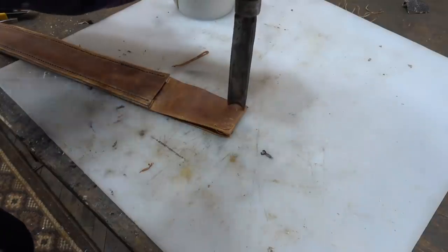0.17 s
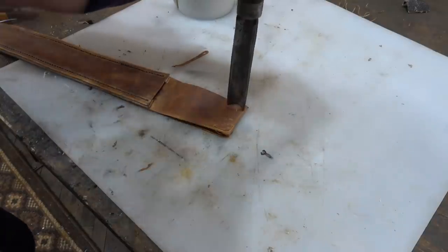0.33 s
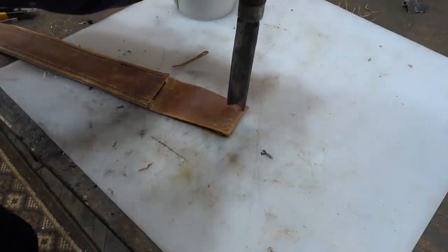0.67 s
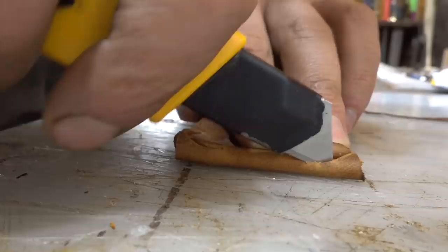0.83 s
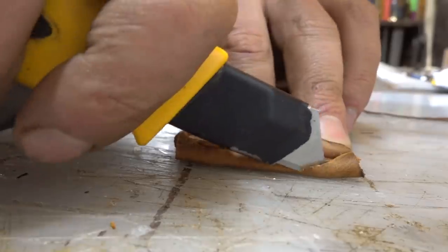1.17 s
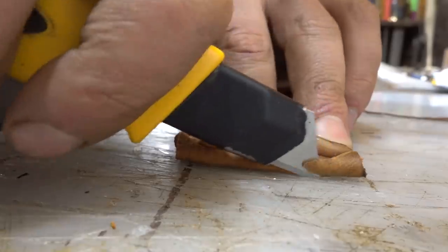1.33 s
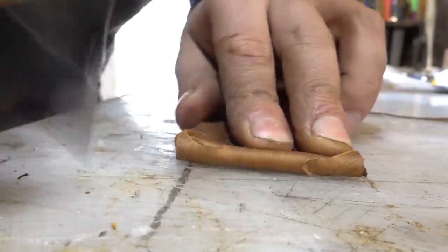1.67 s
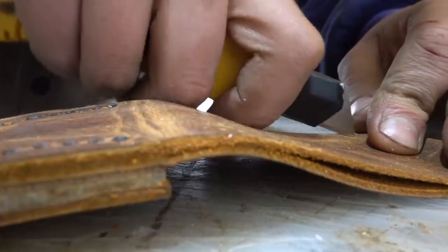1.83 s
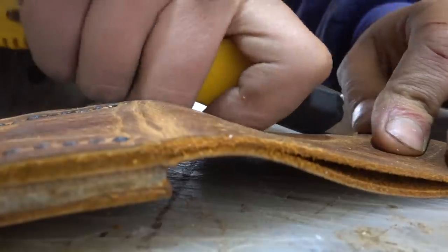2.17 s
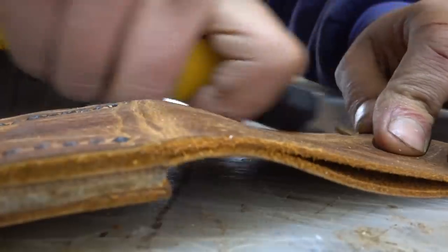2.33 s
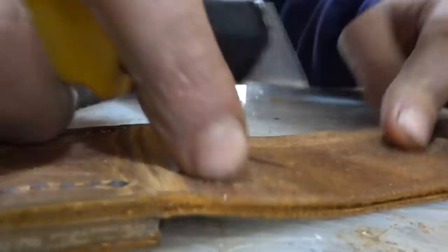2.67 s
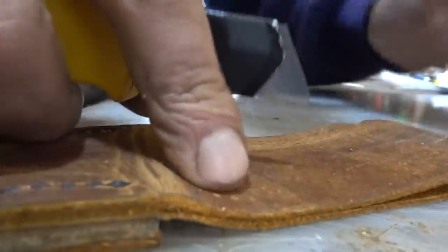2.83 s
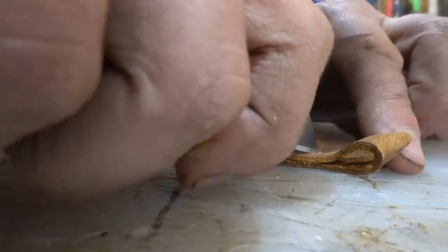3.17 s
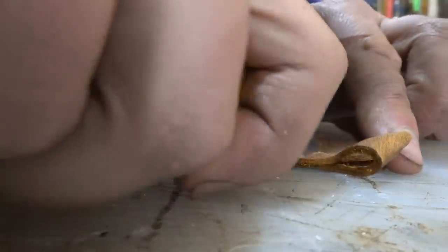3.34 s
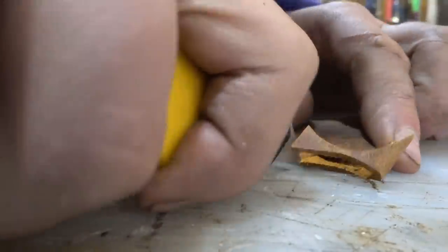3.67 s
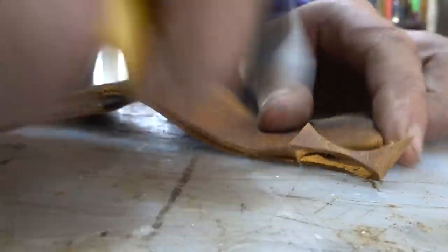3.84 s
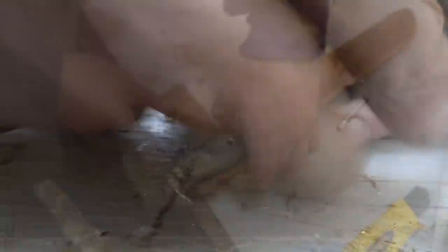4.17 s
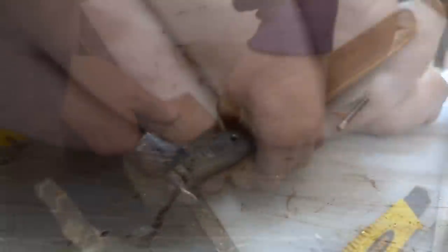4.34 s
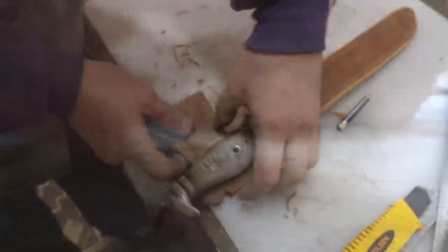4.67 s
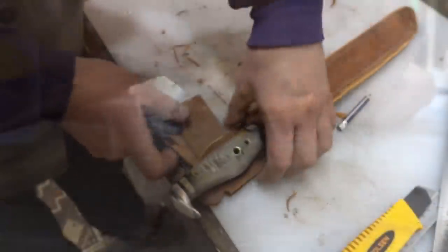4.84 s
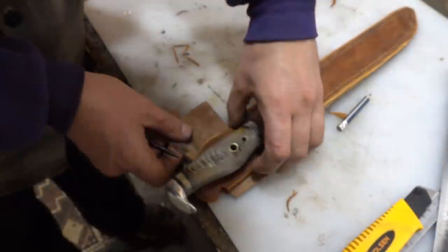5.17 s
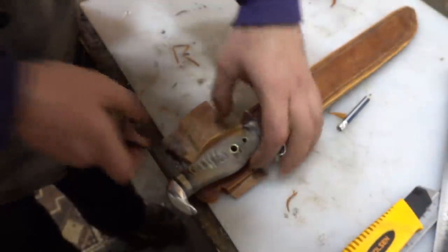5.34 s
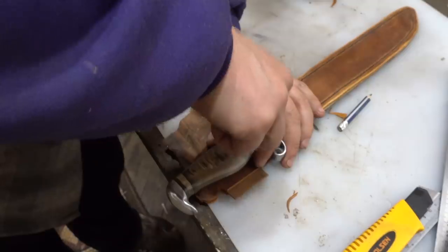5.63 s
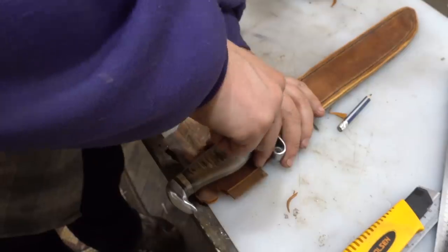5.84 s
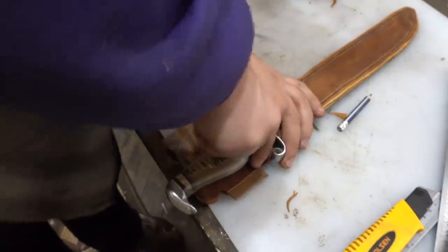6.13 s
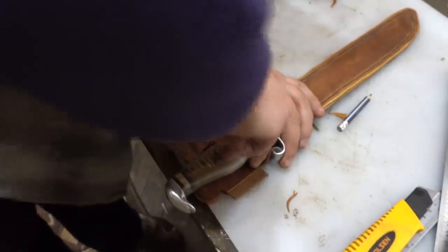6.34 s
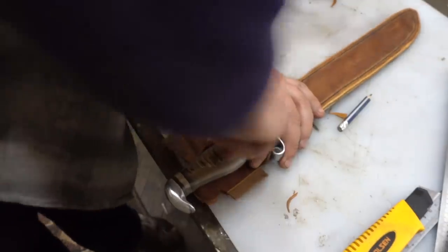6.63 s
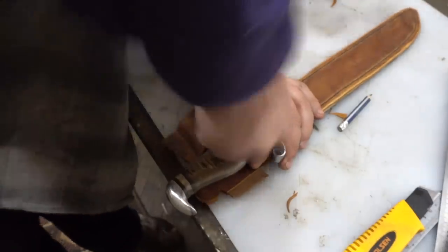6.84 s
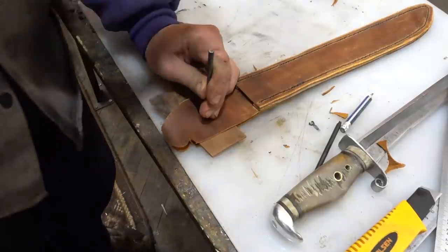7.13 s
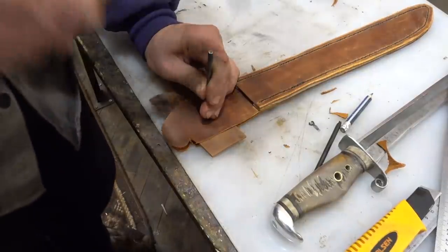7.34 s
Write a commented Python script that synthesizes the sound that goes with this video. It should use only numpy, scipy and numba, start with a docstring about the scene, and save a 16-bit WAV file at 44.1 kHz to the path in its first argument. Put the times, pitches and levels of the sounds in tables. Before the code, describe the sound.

Close stereo pickup at a workbench. Loud, flattened metallic mallet strikes with room ring come first, then suddenly intimate knife work: dry stick-slip rasps through leather, crisp fibre snaps, woody knocks and dull thuds. A softer passage has tiny scribe scratches, light ticks, low hand rumble and cloth rubbing in faint hiss. At the end, two heavy blows burst in with a bright jingling rattle of tools.

```python
"""At a workshop bench, leather is worked on a plastic board in front of a close pair of microphone ports.
Mallet blows on a punch ring bench, steel and room, each flattened by a limiter. Close work is heard between
two mallet shots: stick-slip noise makes a knife rasp and a scribe scratch, short decaying rings make snaps
and knocks, and shaped noise makes hands, sleeves and hiss. In the last two blows loose tools rattle."""
import sys
import numpy as np
from scipy import signal
from scipy.fft import rfft, irfft
from scipy.io import wavfile
from scipy.ndimage import uniform_filter1d, map_coordinates
from numba import njit

SR = 44100
rng = np.random.default_rng(int(sys.argv[2]) if len(sys.argv) > 2 else 0)


def int16_out(signal):
    """Quantize to a 16-bit WAV file."""
    q = np.round(np.clip(np.atleast_2d(signal).T, -1, 1) * 32767)
    wavfile.write(sys.argv[1], SR, q.astype(np.int16))


N = 330750
T = np.arange(N) / SR
HZ = np.maximum(np.arange(N // 2 + 1) * SR / N, 1)

# the close work lies between the two mallet shots
CLOSE_START_S, CLOSE_END_S = .876, 6.92
CLOSE_TOP_HZ, SCRIBE_TOP_HZ, TOP_HZ = 11080, 12150, 14100  # treble cuts

# mallet on a punch: (time [s], force into the limiter [dB], knock [Hz], knock [dB])
BLOWS = [(-.11, 9, 576, 7.5), (.33, 13.5, 448, -24), (.735, 17.5, 470, 4), (6.971, -1.5, 295, 6),
         (7.2709, 5, 380, -17)]
# spectrum of a blow: (frequency [Hz], level [dB])
BLOW_COLOUR = [(40, -8), (120, -2.5), (260, 1.5), (600, 3), (1000, -5), (1450, -7.5), (3700, -12.5),
               (5200, -18.5), (9000, -29), (13500, -44)]
# ringing modes of the bench: (frequency [Hz], level [dB], t60 [s])
BENCH = [(155.5, -6, 0.94), (364, -24, 0.3), (415, -12, 0.88), (572, -13.5, 0.38)]
# the steel punch clangs in a few broad bands: (frequency [Hz], width [Hz], level [dB])
PUNCH = [(1400, 140, 0.5), (2210, 69, -12), (3640, 77, -8.5)]
PUNCH_DB, PUNCH_T60_S = -3, 0.55
# loose tools on the board: (frequency [Hz], width [Hz], level [dB])
LOOSE_TOOLS = [(7870, 1100, 0.5), (9150, 4900, -5.5)]
RATTLE_DB = -7
# a harder blow comes out a little louder: level at force 0, and the share of the force that is added
BLOW_DB, FORCE_SHARE = -38.5, 0.31

# blade strokes: (time of full pressure [s], hold [s], level [dB], rise [s], tearing fibres re level [dB])
STROKES = [(0.923, 0.0042, -48, 0.12, -37), (1.041, 0.03, -34, 0.0026, -15.5),
           (1.173, 0.14, -51.5, 0.053, -16), (1.632, 0.019, -46, 0.037, -4.5),
           (1.996, 0.0068, -21.5, .013, -12), (2.307, 0.21, -54, 0.0073, -7),
           (2.693, 0.084, -48, 0.083, -8.5), (2.918, 0.0051, -49.5, 0.019, -2.5),
           (3.266, 0.012, -23.5, 0.014, -34), (3.297, 0.0034, -27.5, 0.007, -31),
           (3.32, .08, -60, .02, -30), (3.504, 0.028, -38.5, .023, -9), (3.784, 0.013, -39.5, 0.0069, -6.5),
           (3.842, 0.11, -54.5, 0.012, -10)]
# knife and board under the blade: (frequency [Hz], width [Hz], level [dB])
KNIFE = [(336, 330, -3.5), (684, 180, 8.5), (840, 71, -11), (1340, 156, -3.5), (1890, 106, -1.5),
         (2520, 30, -18), (3360, 56, -27), (5060, 28, -22)]
# the thin blade sings as fibres tear: (frequency [Hz], width [Hz], level [dB])
FIBRES = [(2500, 350, 10), (3440, 1100, -6.5), (4580, 1700, 2), (6110, 920, -1.5), (7800, 1430, 2),
          (10430, 5000, -6)]
# leather muffles the highest notes of the tool: (frequency [Hz], level [dB])
MUFFLE = [(5000, 0), (7500, -4.5)]
STROKE_FALL_S, BODY_DB = 0.01, -3.5  # BODY_DB: ring of the tool against the tearing fibres

# scribe passes: (time of full pressure [s], hold [s], level [dB], tearing fibres re level [dB])
SCRIBE_PASSES = [(4.083, 0.025, -59, -0.5), (4.436, 0.025, -56.5, 0), (4.668, 0.012, -53.5, 2),
                 (4.723, 0.091, -59, -5), (4.908, 0.029, -57, -11), (4.964, .09, -64, -8),
                 (5.064, 0.034, -55, -9), (5.265, 0.011, -60, -2.5), (5.32, 0.02, -58, -9)]
# resonances of the scribe's point: (frequency [Hz], width [Hz], level [dB])
POINT = [(2260, 190, -12), (2830, 480, 11), (4370, 410, -7)]
PASS_RISE_S, PASS_FALL_S = 0.032, 0.031
POINT_WAVER = .05  # rms pitch drift, as a share of the pitch, as the scribe tilts in the hand

# blade snapping through: (time [s], level [dB], ring [Hz], crack re level [dB], lead of a first fibre [s])
SNAPS = [(1.664, -16.5, 2530, -3.5, 0.0074), (2.4983, -17.5, 2527, -5, 0.0075),
         (2.5805, -26.5, 2760, 4, 0.0093), (3.8169, -20.5, 5250, 1.5, 0.0021)]
SNAP_T60_S, FIRST_FIBRE_DB, FIRST_CRACK_DB = 0.021, -4.5, 0.5  # the first fibre, relative to the snap
LAST_FIBRE_S, LAST_FIBRE_DB = 0.005, -16.5  # a last fibre follows every snap
# tools shifted and set down: (time [s], level [dB], ring [Hz], crack re level [dB])
TICKS = [(1.826, -33.5, 2300, -19), (2.647, -29, 2150, -14), (2.6595, -20.5, 3000, -15),
         (2.678, -13, 1950, -39), (2.692, -25.5, 2050, -33), (3.726, -36.5, 2480, -13),
         (3.757, -27, 1880, -18), (3.78, -27.5, 1180, 0), (3.849, -33.5, 1400, 0.5),
         (4.316, -37, 5600, -21), (4.682, -42, 7800, 2.5), (5.557, -53.5, 1510, 2), (5.678, -43, 1400, -11),
         (5.959, -46, 1780, -12)]
TICK_CYCLES = 30  # t60 in cycles, so high ticks are shorter
# a tool knocks on the board, always with the board's note: (time [s], level [dB])
KNOCKS = [(1.0095, -24), (1.329, -31.5), (1.593, -33.5), (1.61, -38), (1.635, -30.5), (1.948, -23.5),
          (2.002, -17), (2.778, -36), (3.782, -27.5), (4.88, -40.5), (6.392, -49), (6.578, -47.5)]
KNOCK_HZ, KNOCK_T60_S, KNOCK_CRACK_DB = 666, 0.037, -16
# dull thuds in the bench: (time [s], level [dB])
THUDS = [(1.755, -37), (1.778, -37.5), (1.947, -30), (2.679, -16.5), (3.275, -25), (3.8145, -23),
         (3.894, -31.5), (5.598, -37)]
THUD_HZ, THUD_T60_S, THUD_CRACK_DB = 240, 0.022, -48
# light taps of loose tools and the handle: (time [s], level [dB], ring [Hz])
TAPS = [(2.612, -38, 1495), (4.465, -43.5, 2085), (4.666, -46, 2500), (4.875, -44, 970),
        (5.058, -41.5, 2330), (5.669, -41, 1245), (5.671, -44, 2950)]
TAP_T60_S, TAP_CRACK_DB = 0.069, -14
CONTACT_RISE_S = 0.00024  # time constant with which a contact builds

# the handle is shoved into place
SHOVE_S, SHOVE_HZ, SHOVE_WIDTH_HZ = 5.582, 298, 120
SHOVE_DB, SHOVE_RISE_S, SHOVE_HOLD_S, SHOVE_FALL_S = -42.5, 0.0046, .012, 0.032
# a sleeve brushes over the work: (time [s], level [dB])
BRUSHES = [(6.01, -63.5), (6.24, -62.5), (6.42, -62), (6.6, -60), (6.84, -65)]
BRUSH_RISE_S, BRUSH_FALL_S = 0.051, .055
# spectrum of the sleeve: (frequency [Hz], level [dB])
CLOTH = [(300, -3), (680, 5.5), (1400, -8), (2600, -10), (9000, -18)]

# hands and sleeves bear on the bench:
# (time of full weight [s], hold [s], level [dB], rubbing re level [dB], drone of the loaded bench [Hz])
LEANS = [(1.333, 0.22, -57.5, -13, 88), (2.288, 0.35, -56, -9, 95.6), (3.782, 0.022, -52.5, -5.5, 130),
         (4.406, 0.0085, -59, -21, 109), (4.864, 0.0044, -63, 8.5, 93), (5.576, 0.12, -54.5, 0, 57),
         (6.535, 0.23, -60.5, -27, 62)]
# a long lean eases off slowly: the fall grows by this share of the hold
LEAN_RISE_S, LEAN_FALL_S, LEAN_FALL_SHARE = 0.013, 0.074, 1
DRONE_WIDTH_HZ = 15
# spectrum of skin and cloth on the bench: (frequency [Hz], level [dB])
RUB = [(120, -4), (260, 9.5), (700, -1), (1200, -7), (2200, -14), (5000, -74)]
# spectrum of bench rumble: (frequency [Hz], level [dB])
RUMBLE = [(25, -3), (60, -5), (100, -3.5), (200, -9.5), (400, -13.5), (3000, -54)]
REST_RUMBLE_DB, QUIET_DB = -64.5, -69.5  # bench at rest in the close work; rumble under everything

# steady hiss: (frequency [Hz], level [dB])
HISS = [(100, 10), (1000, 2.5), (2500, 0), (5000, -4.5), (11000, -8.5)]
HISS_DB = -63
# workshop reverberation: (frequency [Hz], t60 [s])
ROOM_T60 = [(100, 1), (600, 0.68), (2000, 0.79), (5000, 0.64), (11000, 0.46)]
# side minus mid between the two microphone ports: (frequency [Hz], level [dB])
WIDTH = [(60, -35), (200, -17.5), (650, -11), (1300, -6), (2400, -6), (4200, -1), (11000, -0.5)]
# left port minus right port: (frequency [Hz], level [dB])
PORTS = [(1200, -0.5), (2600, 0), (4500, 0), (8000, -0.5)]


def mallet(crack_db=3, crack_t60=0.32, knock_width_hz=170, knock_t60=0.61,
           rattle_peak_s=0.091, rattle_length_s=0.077):
    """Blows crack, knock and fill the room; the first shot rings bench and punch, the last rattles tools."""
    out, t = np.zeros((2, N)), T[:SR]
    crack = colour(noise(), BLOW_COLOUR)[:, :SR] * fade(t, crack_t60) * undb(crack_db)
    chatter = resonate(grit(6000, 2.0), LOOSE_TOOLS)[:, :SR]
    chatter = chatter * np.exp(-((t - rattle_peak_s) / rattle_length_s) ** 2 / 2)
    boom = sum(undb(db) * np.sin(2 * np.pi * f * t) * fade(t, t60) for f, db, t60 in BENCH)
    for s, force_db, knock_hz, knock_db in BLOWS:
        first_shot = s < CLOSE_START_S
        knock = steep_band(noise(), knock_hz, 2 * knock_width_hz)[:, :SR]
        knock = knock * fade(t, knock_t60) * undb(knock_db)
        clang = resonate(noise(), PUNCH)[:, :SR] * fade(t, PUNCH_T60_S) * undb(PUNCH_DB)
        ringing = first_shot * (boom + clang)
        blow = undb(force_db) * (crack + knock + ringing + reverberation(BLOW_COLOUR))
        rattle = (not first_shot) * undb(RATTLE_DB) * chatter
        add(out, s, undb(BLOW_DB + FORCE_SHARE * force_db) * (limit(blow) + rattle))
    # only the first shot has its treble cut here
    return lowpass(out * (T < CLOSE_START_S), CLOSE_TOP_HZ) + out * (T > CLOSE_END_S)


def blade():
    """The knife rasps by stick-slip through the leather, with a faint answer of the room."""
    strokes = [(s, db, rise_s, hold_s, STROKE_FALL_S, tear_db) for s, hold_s, db, rise_s, tear_db in STROKES]
    rasp = friction(strokes, KNIFE, per_s=1400, spread_db=1.5, catch_db=1.37)
    return workshop(rasp, wet_db=-16.5) + withdrawal()


def withdrawal(start_s=1.672, stop_s=1.836, db=-50, t60=1.65):
    """After snapping through, the blade slides on with a thin rasp: fine slips through treble resonances."""
    rasp = resonate(grit(4000, 1.4), [(2500, 380, -6.5), (4380, 770, -5.0)])
    rasp = resonate(rasp, [(3250, 1700, 0)])
    sliding = (T > start_s) & (T < stop_s)
    return undb(db) * rasp * sliding * fade(np.maximum(T - start_s, 0), t60)


def scribe():
    """The point scratches round the handle in short passes that swell and lift off."""
    passes = [(s, db, PASS_RISE_S, hold_s, PASS_FALL_S, tear_db) for s, hold_s, db, tear_db in SCRIBE_PASSES]
    scratch = friction(passes, POINT, per_s=1800, spread_db=-0.4, catch_db=1.5)
    return waver(scratch, POINT_WAVER)


def friction(strokes, modes, per_s, spread_db, catch_db):
    """The edge catches unevenly in the grain; the slips ring the tool while fibres tear with a hiss."""
    body, tear = pressure(strokes)
    catch = uniform_filter1d(uniform_filter1d(rng.standard_normal(N), size=300), size=300)
    slips = grit(per_s, spread_db) * undb(catch_db * np.clip(catch / catch.std(), -2, 2))
    tool_ring = colour(resonate(slips * body, modes), MUFFLE)
    return tool_ring * undb(BODY_DB) + resonate(slips * tear, FIBRES)


def clicks(crack_t60=0.013, board_db=-14, board_t60=0.022, wander=0.14):
    """A sudden release: a crack, one short ring of the part that is hit, and a shiver of knife and board."""
    rings, bursts, t = np.zeros((2, N)), np.zeros((2, N)), T[:SR // 8]
    attack = 1 - np.exp(-t / CONTACT_RISE_S)
    cracks, shivers = resonate(noise(), FIBRES), resonate(noise(), KNIFE)
    for k, (s, db, hz, t60, crack_db) in enumerate(contacts()):
        own = slice(k * len(t), (k + 1) * len(t))  # a fresh piece of noise for every contact
        # the contact shifts while the part rings, so its pitch is blurred
        blur = np.cumsum(rng.standard_normal((2, len(t))), axis=1)
        blur = uniform_filter1d(blur * np.sqrt(2 * np.pi * wander * hz / SR), int(SR / hz))
        ring = np.sin(2 * np.pi * hz * t + blur - blur[:, :1]) * fade(t, t60)
        crack = undb(crack_db) * cracks[:, own] * fade(t, crack_t60)
        shiver = undb(board_db) * shivers[:, own] * fade(t, board_t60)
        add(rings, s, undb(db) * attack * ring)
        add(bursts, s, undb(db) * attack * (crack + shiver))
    # the rings send less into the room than the noisy cracks and shivers do
    return workshop(rings, wet_db=-19.5) + workshop(bursts, wet_db=-13.5)


def contacts():
    """All contacts as (time [s], level [dB], ring [Hz], t60 [s], crack [dB]); a snap is three releases."""
    hits = []
    for s, db, hz, crack_db, lead_s in SNAPS:
        hits += [(s - lead_s, db + FIRST_FIBRE_DB, hz, SNAP_T60_S, crack_db + FIRST_CRACK_DB),
                 (s, db, hz, SNAP_T60_S, crack_db),
                 (s + LAST_FIBRE_S, db + LAST_FIBRE_DB, hz, SNAP_T60_S, crack_db)]
    hits += [(s, db, hz, TICK_CYCLES / hz, crack_db) for s, db, hz, crack_db in TICKS]
    hits += [(s, db, KNOCK_HZ, KNOCK_T60_S, KNOCK_CRACK_DB) for s, db in KNOCKS]
    hits += [(s, db, THUD_HZ, THUD_T60_S, THUD_CRACK_DB) for s, db in THUDS]
    return hits + [(s, db, hz, TAP_T60_S, TAP_CRACK_DB) for s, db, hz in TAPS]


def handling():
    """The shoved handle judders as a narrow band of noise; a sleeve brushes softly as grainy noise."""
    shove = pressure([(SHOVE_S, SHOVE_DB, SHOVE_RISE_S, SHOVE_HOLD_S, SHOVE_FALL_S, 0)])[0]
    brushing = pressure([(s, db, BRUSH_RISE_S, 0, BRUSH_FALL_S, 0) for s, db in BRUSHES])[0]
    judder = shove * steep_band(noise(), SHOVE_HZ, SHOVE_WIDTH_HZ)
    return judder + brushing * colour(grit(1500, 5.0), CLOTH)


def hands(rest_rub_db=-75, rumble_db=-2):
    """Leaning hands rumble through the bench and set it droning; skin and cloth rub with a fine grain."""
    leans = [(s, db, LEAN_RISE_S, hold_s, LEAN_FALL_S + LEAN_FALL_SHARE * hold_s, rub_db)
             for s, hold_s, db, rub_db, hz in LEANS]
    weight, rubbing = pressure(leans)
    rumble = colour(noise(), RUMBLE) * np.hypot(undb(rumble_db) * weight, undb(REST_RUMBLE_DB))
    drone = np.zeros((2, N))
    for lean, (*_, hz) in zip(leans, LEANS):
        drone += resonate(noise(), [(hz, DRONE_WIDTH_HZ, 0)]) * pressure([lean])[0]
    rub = colour(grit(2500, 4.8), RUB) * np.hypot(rubbing, undb(rest_rub_db))
    return rumble + drone + rub


def hiss():
    """Steady coloured noise behind the close work."""
    return undb(HISS_DB) * colour(noise(), HISS)


def quiet_rumble():
    """Faint steady low noise under everything."""
    return undb(QUIET_DB) * colour(noise(), RUMBLE)


def workshop(x, wet_db):
    """Close sounds plus the faint, dull answer of the room, fed from the mid channel."""
    response = reverberation([(100, 3.0), (700, -1), (2500, -2.0), (10000, -4.5)])
    response /= np.sqrt(np.sum(response[0] ** 2))
    return x + undb(wet_db) * signal.fftconvolve(x[:1], response, axes=1)[:, :N]


def reverberation(points):
    """One second of diffuse noise with spectrum points, each octave decaying at the room's own rate."""
    spectrum = rfft(rng.standard_normal((2, SR)))
    hz, t = np.arange(SR // 2 + 1) + 1., T[:SR]
    gain = undb(read(points, hz))
    spectrum *= gain / np.sqrt(np.mean(gain ** 2))
    octave = np.floor(np.log2(hz))
    return sum(irfft(spectrum * (octave == k), SR) * fade(t, read(ROOM_T60, 2 ** (k + .5)))
               for k in range(4, 14))


@njit
def follow(power, release):
    """A level detector that jumps up at once and sinks exponentially."""
    out, held = np.empty(len(power)), 0.
    for i in range(len(power)):
        held = max(power[i], held * release)
        out[i] = held
    return out


def limit(x, release_s=0.011, ratio=7):
    """Compress what exceeds rms 1, so that a blow is flattened against its reverberation."""
    smooth = uniform_filter1d(np.sum(x ** 2, axis=0), size=200)
    power = follow(smooth, np.exp(-1 / (release_s * SR)))
    return x * np.maximum(power, 1) ** (.5 / ratio - .5)


def pressure(strokes):
    """Each stroke builds, holds and lets go; gives the strength of its body sound and of its hiss."""
    body_power, hiss_power = np.zeros(N), np.zeros(N)
    for s, db, rise_s, hold_s, fall_s, hiss_db in strokes:
        away = np.maximum((s - T) / rise_s, (T - s - hold_s) / fall_s)
        power = undb(db) ** 2 * np.exp(-2 * np.maximum(away, 0))
        body_power += power
        hiss_power += power * undb(hiss_db) ** 2
    return np.sqrt(body_power), np.sqrt(hiss_power)


def grit(per_s, spread_db):
    """Stick-slip: tiny releases of unequal strength at random moments; rms 1."""
    strength = undb(spread_db * np.minimum(rng.exponential(size=N), 4))
    slips = (rng.random(N) < per_s / SR) * strength
    x = slips * np.sign(noise())
    return x / x.std()


def waver(x, share):
    """Let the pitch of x drift up and down at random by a varying delay."""
    lag = rng.standard_normal(N)
    for _ in range(3):
        lag = uniform_filter1d(lag, size=1800)
    at = np.arange(N) + share * lag / np.diff(lag).std()
    return np.array([map_coordinates(channel, [at], mode="nearest") for channel in x])


def noise():
    """Unrelated white noise for mid and side."""
    return rng.standard_normal((2, N))


def undb(db):
    """Decibels to gain."""
    return 10 ** (np.asarray(db) / 20)


def fade(t, t60):
    """Free decay, 60 dB down after t60."""
    return np.exp(-np.log(1000) * t / t60)


def read(points, hz):
    """Interpolate a table of (frequency [Hz], value) on a log-frequency axis."""
    f, value = np.transpose(points)
    return np.interp(np.log(hz), np.log(f), value)


def shape(x, response):
    """Filter by a frequency response that keeps the power of white noise."""
    return irfft(rfft(x) * response / np.sqrt(np.mean(abs(response) ** 2)), N)


def colour(x, points):
    """Give x a spectrum of (frequency [Hz], level [dB]) points."""
    return shape(x, undb(read(points, HZ)))


def resonate(x, modes):
    """Pass x through parallel resonances (frequency [Hz], width [Hz], level [dB])."""
    response = sum(undb(db) / (1 + 1j * (HZ / f - f / HZ) * f / width) for f, width, db in modes)
    return shape(x, response)


def steep_band(x, hz, width_hz):
    """One resonance applied twice; rms 1."""
    x = resonate(resonate(x, [(hz, width_hz, 0)]), [(hz, width_hz, 0)])
    return x / x.std()


def lowpass(x, hz):
    """Steep treble cut: 0.2 dB ripple, 90 dB down."""
    return signal.sosfilt(signal.ellip(14, .2, 90, hz, fs=SR, output="sos"), x)


def add(out, s, x):
    """Mix x into out from time s on."""
    start = int(round(s * SR))
    first, last = max(start, 0), min(start + x.shape[-1], N)
    out[:, first:last] += x[:, first - start:last - start]


def stereo(x):
    """Mid and side to left and right; the ports differ most in the treble, least in the bass."""
    side = irfft(rfft(x[1]) * undb(read(WIDTH, HZ)), N)
    return np.array([x[0] + side, x[0] - side])


def scene():
    """The close work with knife and scribe, between the two mallet shots."""
    close_shot = (T >= CLOSE_START_S) & (T < CLOSE_END_S)
    close = lowpass(close_shot * (blade() + handling() + hands() + hiss()), CLOSE_TOP_HZ)
    scratching = lowpass(scribe(), SCRIBE_TOP_HZ)
    tools = lowpass(clicks(), CLOSE_TOP_HZ)
    return stereo(mallet() + close + scratching + tools + quiet_rumble())


def record(dry):
    """Each microphone port has its own slight colour; the top is cut."""
    half_difference = np.array([[.5], [-.5]]) * read(PORTS, HZ)
    return lowpass(irfft(rfft(dry) * undb(half_difference), N), TOP_HZ)


dry = scene()
out = record(dry)
int16_out(out)
```